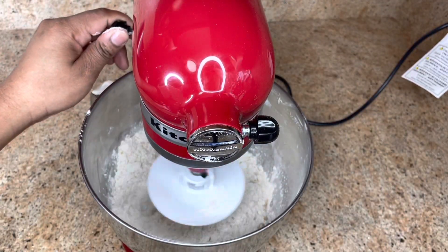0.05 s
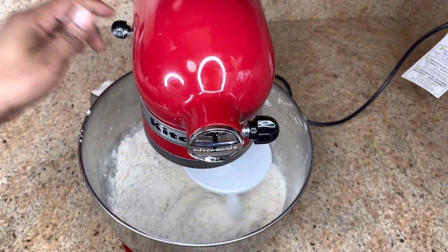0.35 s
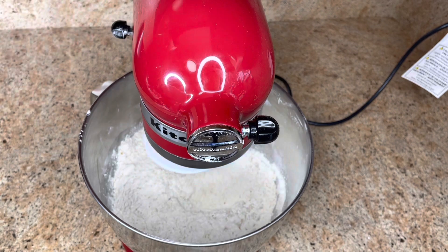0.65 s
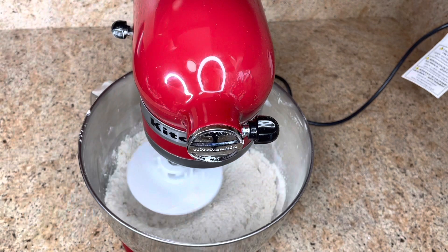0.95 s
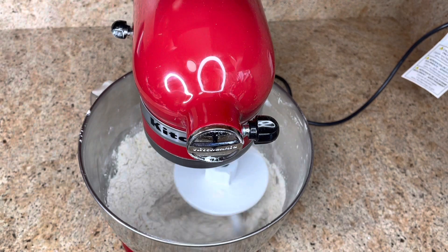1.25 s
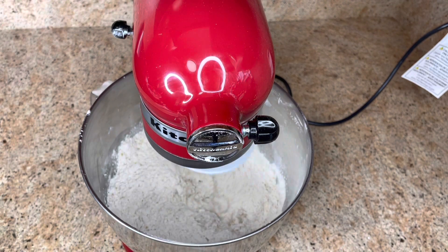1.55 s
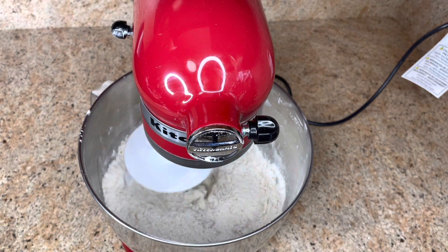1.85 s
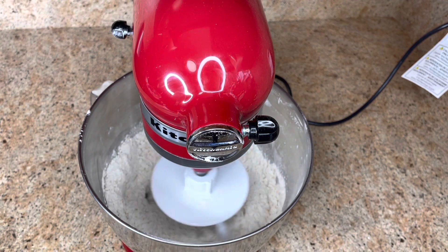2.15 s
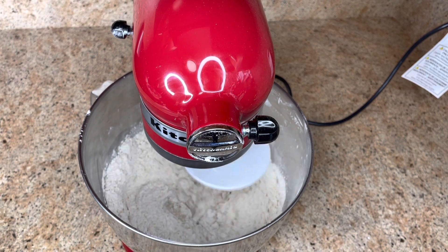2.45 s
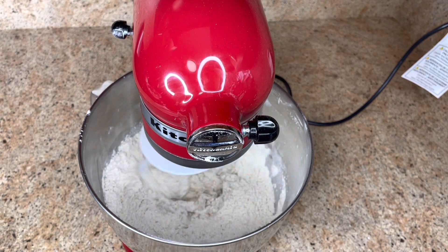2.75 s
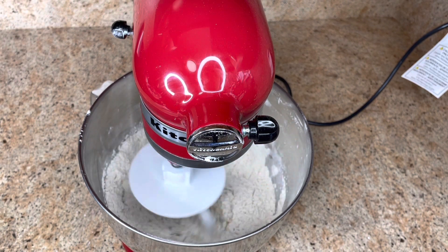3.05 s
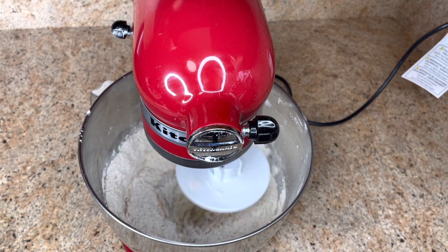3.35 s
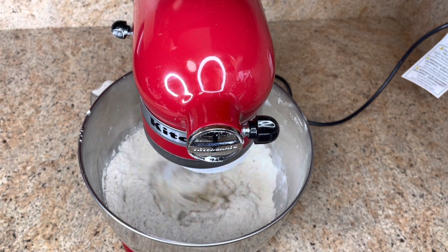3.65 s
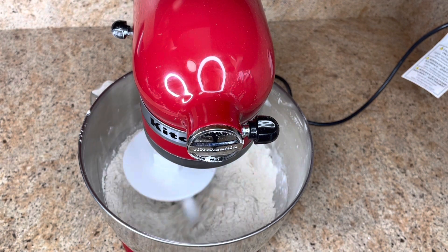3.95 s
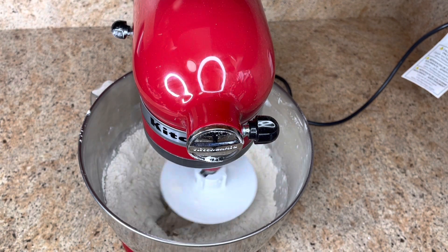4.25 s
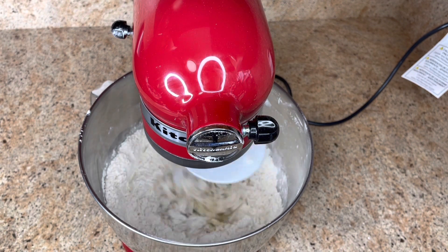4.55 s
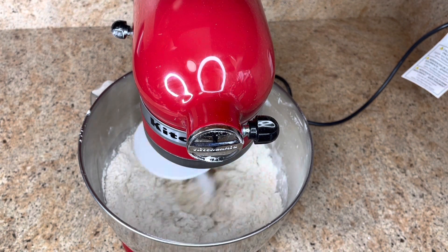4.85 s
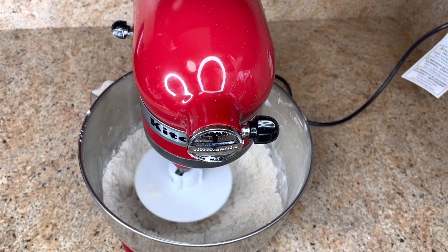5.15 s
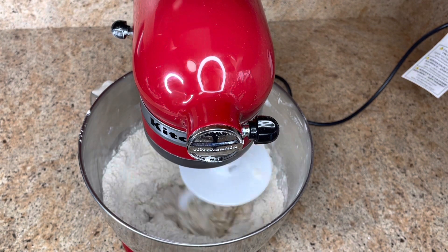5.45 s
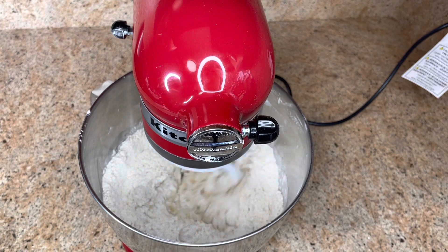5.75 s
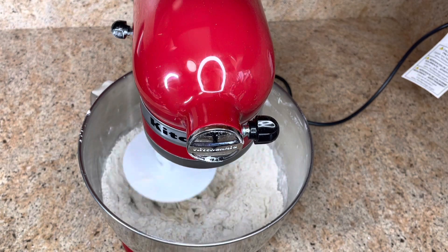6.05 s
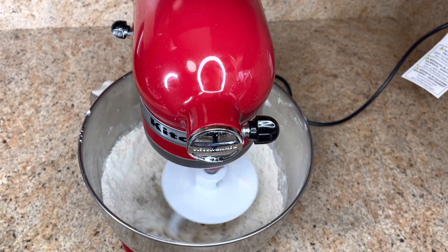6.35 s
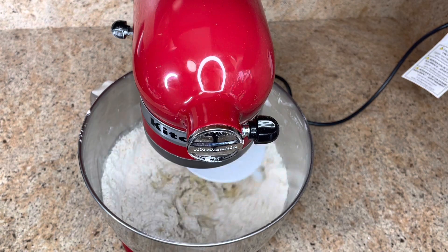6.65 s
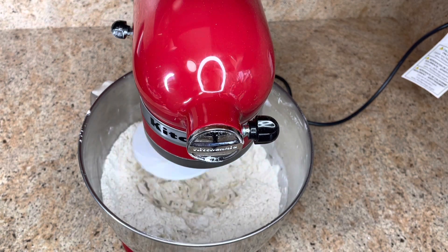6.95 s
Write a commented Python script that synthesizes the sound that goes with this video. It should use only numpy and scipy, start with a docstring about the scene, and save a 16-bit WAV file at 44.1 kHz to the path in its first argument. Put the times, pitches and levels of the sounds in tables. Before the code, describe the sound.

A stand mixer runs steadily close by, its motor buzzing and whining over a pulsing gear rumble and dull knocks of dough.

```python
"""Stand mixer kneading dough

A brush motor, heard close by, buzzes with the chopped mains current and whines at the commutator rate.
Its rattle excites the resonances of housing and steel bowl, over the hiss of brushes and cooling air.
The gears rumble at each push of the hook; lumps knock, and the dough groans by stick-slip friction."""
import sys
import numpy as np
from scipy import signal
from scipy.fft import rfft, irfft
from scipy.io import wavfile

SR = 44100
rng = np.random.default_rng(int(sys.argv[2]) if len(sys.argv) > 2 else 0)


def materialize(psi):
    """Save the field psi as 16-bit PCM at rate SR to the path in sys.argv[1].

    A 1-D psi becomes a single channel; in a 2-D psi each row is a channel.
    """
    bounded = np.clip(np.atleast_2d(psi).T, -1, 1)
    quanta = np.round(bounded * 32767).astype(np.int16)
    wavfile.write(sys.argv[1], SR, quanta)


N = 313992
TIME = np.arange(N) / SR
FREQS = np.maximum(np.arange(N // 2 + 1) * SR / N, 1)
PULSE_HZ, COMMUTATOR_BARS = 120, 22   # pulses of mains current; bars around the rotor
SPIN_HZ, SPIN_START_S = 3.14, .045   # the hook spins on its own axis

# Motor speed, sinking as the dough stiffens. Each row: time in seconds, turns per minute.
MOTOR_SPEED = [(0, 2732), (.5, 2740), (1, 2739), (2, 2744), (2.55, 2736), (3.05, 2735), (3.55, 2738),
               (4.05, 2726), (4.6, 2730), (5.1, 2723), (6.6, 2724), (7.12, 2717)]
# Motor loudness. Each row: time in seconds, relative levels of buzz and of whine in dB.
MOTOR_LEVELS = [(0.25, -42, -44.5), (0.75, -41, -46.5), (1.18, -40, -45.5), (3.05, -40.5, -47),
                (3.62, -42, -46.5), (5.43, -41.5, -49.5), (6.12, -40, -46), (6.73, -40, -48.5),
                (6.9, -40, -49)]
# Partials of the buzz. Each row: multiple of the pulse rate, multiple of the shaft rate added to it,
# relative level in dB, left-right balance in dB.
BUZZ_PARTIALS = [(0, 1, -60.6, 0), (1, 0, -45.6, 0), (2, 0, -53.5, -1), (4, 1, -62.5, -1),
                 (4, 2, -58.1, 10), (5, 1, -61.7, 4), (6, -1, -59.3, 4), (6, 0, -57, 4), (8, 1, -59.2, 8),
                 (0, 15, -58.1, 6), (0, 16, -59.1, 3), (0, 17, -53.5, 6), (2, 17, -62.2, 7),
                 (-1, 18, -58.4, 1), (-1, 19, -53.4, 3), (-1, 20, -54.0, 0), (0, 20, -57.9, 6),
                 (1, 20, -59.9, 0), (-2, 21, -43, 3), (-1, 21, -55.5, -3), (0, 21, -54.1, 1),
                 (1, 21, -52.7, 4), (2, 21, -58.8, 8), (3, 21, -58.7, 5), (-2, 22, -45.8, 7),
                 (-3, 23, -58.9, 4), (-2, 23, -55.9, 0), (-1, 23, -56.9, 3), (0, 23, -55.3, 4),
                 (1, 23, -62.2, 15), (2, 23, -60.8, -3), (-3, 24, -54.0, 2), (-2, 24, -62.2, -13),
                 (-1, 24, -62.1, -3), (-3, 25, -57.6, 3), (-1, 25, -57.2, 7), (0, 25, -58.3, 3),
                 (-4, 27, -59.4, 5), (3, 39, -59.9, 10), (2, 41, -63.1, 11), (1, 42, -59.8, 11),
                 (2, 42, -60.1, 4), (1, 43, -60.0, 10), (0, 44, -55.5, 7), (0, 45, -57.5, 7),
                 (1, 45, -61.1, 3), (0, 47, -59.8, 7), (-1, 49, -61.8, 16), (0, 43, -61, 5),
                 (0, 87, -68, 4)]
# The drone, where the bowl amplifies the buzz. Each row: time in seconds, relative level in dB.
DRONE_LEVELS = [(0, -41), (1.05, -43), (1.6, -41), (2.3, -41), (2.8, -42.5), (3.7, -40), (4.4, -41.5),
                (5.2, -40.5), (6, -42.5), (7.12, -42.5)]
# Throbs of the drone. Each row: time of the crest in seconds, swing in dB.
DRONE_THROBS = [(0, 1.5), (.38, 2), (.8, 1.5), (1.28, 2.2), (1.57, 2.2), (1.85, 1.6), (2.12, 1.6),
                (2.42, 2.6), (2.8, 3.6), (3.11, 3), (3.4, 2.4), (3.72, 2.2), (4.06, 3.2), (4.37, 3.6),
                (4.61, 3), (4.84, 1.6), (5.1, 1), (5.45, 1), (5.85, 1), (6.18, 1), (6.48, 1), (6.9, 1),
                (7.2, 1)]
# Commutator tone and sidebands. Each row: offset in pulse rates, relative level in dB, balance in dB.
WHINE_PARTIALS = [(-1, -6.3, -3), (0, 1.7, 9), (1, -4.3, 10), (2, -13, -1)]
# Overtones of bars striking brushes. Each row: multiple of the bar rate, level in dB.
BAR_OVERTONES = [(2, -57.5), (4, -66), (6, -75), (10, -68), (12, -61)]
# The thin motor whistle. Each row: time in seconds, relative level in dB.
WHISTLE_LEVELS = [(0.1, -48.5), (0.82, -48.5), (1.07, -56), (1.27, -54.5), (4.68, -50.5), (4.92, -60.5),
                  (5.13, -49.5), (6.1, -50.5), (6.63, -51.5), (6.88, -54), (7.1, -48)]
# The hook meets the dough twice per orbit. Each row: time in seconds, relative load in dB.
HOOK_PUSHES = [(-.05, -5.5), (.45, 1.5), (.97, -0.5), (1.46, 1), (1.97, 1.5), (2.52, 0), (2.96, 0.7),
               (3.57, 1), (4.02, 0), (4.65, -0.2), (5.14, 1), (5.65, 0.9), (6.13, 0.6), (6.72, 1.5),
               (7.18, 1.5)]
# Gear tones. Each row: nominal frequency in Hz, relative level in dB, swell in dB per dB of load.
GEAR_TONES = [(52, -24, .4), (75.3, -11.5, .5), (106.2, -2, 1.3), (136.6, -3.4, 1.2)]
# Gear rumble through the worktop. Each row: frequency in Hz, relative spectral level in dB.
RUMBLE_SPECTRUM = [(20, -68), (42, -68), (62, -34), (78, -29.5), (92, -25.5), (112, -24.5), (140, -29),
                   (165, -47), (200, -45), (300, -68)]
# Lumps striking the hook. Each row: start in seconds, peak of the envelope in dB.
LUMP_KNOCKS = [(.402, -26), (1.45, -33), (1.887, -30), (1.983, -33), (2.391, -35), (2.517, -26),
               (2.888, -27), (3.528, -26), (4.611, -25), (4.676, -37), (5.119, -35), (5.577, -29.5),
               (5.750, -39), (6.092, -26.5), (6.637, -31), (6.702, -26), (6.765, -29)]
# Modes of housing and bowl. Each row: frequency in Hz, width in Hz, spectral level in dB, balance in dB.
HOUSING_MODES = [(419, 16, -76, 13), (591, 31, -72.5, 1.5), (688, 14, -70.5, 6), (717, 14, -70, 3),
                 (750, 24, -68, 4), (788, 14, -72, -2), (837, 12, -77, -5), (890, 20, -74, -1),
                 (1005, 20, -71, 3), (1046, 15, -75.5, 0), (1078, 15, -75.5, 1), (1130, 22, -71.5, 4),
                 (1215, 12, -82, -5), (1284, 7.9, -69.5, 2), (1316, 14, -71.5, 26), (1547, 44, -75.5, -6),
                 (1592, 6, -68, 11), (1713, 34, -81.5, 16), (2066, 83, -72.5, 9), (2113, 20, -69, 2),
                 (2245, 48, -78.5, 36), (2432, 43, -76.5, -20), (2585, 13, -69.5, 17), (2816, 84, -77, 2.5),
                 (2954, 58, -81, -2), (3078, 35, -78, 25), (3344, 224, -85.5, 7)]
# Rasp of the upper housing modes. Each row: time in seconds, level in dB before its swing is scaled.
RASP_CONTOUR = [(0, -54), (.2, -48.5), (.4, -49.5), (.85, -49), (1.1, -51.5), (1.3, -50.3), (1.65, -49.8),
                (1.8, -52), (2.1, -51), (2.6, -52), (3.05, -50.5), (3.2, -51.5), (4.2, -51.2),
                (4.55, -49.6), (4.9, -49), (5.3, -49.6), (5.5, -51.2), (5.9, -48.8), (6.25, -49.5),
                (6.5, -50.8), (6.85, -48.5), (7.12, -50.5)]
# Modes under the brushes. Each row: frequency in Hz, width in Hz, spectral level in dB, balance in dB.
BRUSH_MODES = [(3980, 60, -84.3, 5), (4835, 380, -90, 3), (5300, 85, -89, 6), (6050, 250, -91, 1),
               (6580, 190, -91, 2), (7170, 200, -93, 4), (8050, 700, -93, 0), (8750, 150, -80.5, 0),
               (9090, 210, -80.5, 0), (9650, 170, -88, 0), (10090, 270, -82, 0), (11250, 460, -83.5, 0),
               (12010, 130, -82, 0), (12700, 450, -94, 0)]
# Cooling air and friction. Each row: frequency in Hz, spectral level in dB.
AIR_SPECTRUM = [(170, -67), (200, -85.5), (330, -77), (500, -80.5), (900, -73.5), (1400, -81.5),
                (2600, -87), (3500, -87.5), (4400, -92), (5550, -99.5), (8000, -104), (12300, -110),
                (13500, -100.5), (14000, -108.9)]
# Groans of the dough. Each row: middle in seconds, length in seconds, frequency in Hz, level in dB.
DOUGH_GROANS = [(.23, 0.31, 243.7, -45.5), (0.509, 0.26, 242.7, -44), (1.422, .2, 235, -45.5),
                (1.799, .16, 265, -49.5), (2.454, 0.2, 261, -50), (2.764, 0.22, 270, -51),
                (4.34, 0.31, 270, -51.5), (6.476, 0.21, 276, -49)]
# Hollow of the bowl. Each row: frequency in Hz, width in Hz, relative level in dB, balance in dB.
CAVITY_MODES = [(239.8, 18, 11, 8.5), (266, 13, 8.5, -3), (418, 44, -2, -14)]
# Likeness of left and right. Each row: frequency in Hz, squared coherence from 0 to 1.
COHERENCE = [(150, .96), (400, .85), (800, .7), (1300, .5), (2000, .35), (7000, .25), (7700, .97),
             (9400, .97), (10200, .6), (12500, .9)]
# Phase lead of left over right. Each row: frequency in Hz, lead in radians.
PHASE_LEAD = [(100, .08), (200, .05), (520, .1), (660, -1.1), (875, -1), (935, -3), (1010, -.6),
              (1550, -.1), (2130, -2.4), (2280, .3), (3000, 1.3), (7100, -1.2), (7700, -3), (9300, -3.25),
              (9900, -4), (12000, -5.3), (12600, -6.2)]


def from_db(db):
    """Amplitude ratio of a level in dB."""
    return np.exp(np.asarray(db) * (np.log(10) / 20))


def unit_rms(x):
    """Normalisation to unit power."""
    return x / np.sqrt(np.mean(x ** 2) + 1e-20)


def in_time(rows):
    """Linear interpolation of a table's columns at every sample."""
    times, *columns = np.transpose(rows)
    return [np.interp(TIME, times, column) for column in columns]


def swell_of(rows):
    """Deviation of a level curve from its mean, in dB."""
    db, = in_time(rows)
    return db - db.mean()


def event_phase(rows):
    """Phase in cycles, reaching a whole number at each event."""
    return np.interp(TIME, np.transpose(rows)[0], np.arange(len(rows)))


def at_hz(points, hz):
    """Interpolation of a spectrum on a log-frequency axis."""
    freqs, values = np.transpose(points)
    return np.interp(np.log(hz), np.log(np.sort(freqs)), values)


def drift(corner_hz):
    """Low-pass noise: a slow random fluctuation of rms 1."""
    spectrum = rfft(rng.standard_normal(N // 40))
    slow = irfft(spectrum / (1 + (FREQS[:N // 80 + 1] / corner_hz) ** 2) ** 2)
    return np.interp(TIME, np.linspace(0, TIME[-1], len(slow)), unit_rms(slow))


def pan(balance_db):
    """Left and right gains of constant total power."""
    return unit_rms(from_db(np.array([[.5], [-.5]]) * balance_db))


def tone(cycles, hz, balance_db=0):
    """A stereo sinusoid of rms 1 and random starting phase; hz sets the phase lead of the left side."""
    lead = at_hz(PHASE_LEAD, hz) * np.array([[.5], [-.5]])
    return np.sqrt(2) * pan(balance_db) * np.sin(2 * np.pi * (cycles + rng.random()) + lead)


def resonances(modes):
    """Power addition: the stereo spectral density of steep-sided modes."""
    return sum((pan(balance) * from_db(db) / (1 + (0.89 * (FREQS - hz) / width) ** 2)) ** 2
               for hz, width, db, balance in modes)


def friction(force, power):
    """Source and filter: partly coherent stereo noise follows a force and takes on a power spectrum."""
    mid, side = rfft(rng.standard_normal((2, N)) * unit_rms(force))
    coherence = at_hz(COHERENCE, FREQS) ** .5
    signs = np.array([[1], [-1]])
    pair = np.sqrt(1 + coherence) * mid + signs * np.sqrt(1 - coherence) * side
    pair *= np.exp(.5j * signs * at_hz(PHASE_LEAD, FREQS))
    return irfft(pair * np.sqrt(power * SR) / 2, N)


def reflections(count=10, echo_db=-22):
    """Comb filtering: short echoes from worktop, bowl and wall ripple the power spectrum."""
    delays_s = rng.uniform(0.0038, .025, count)
    paths = 1 + from_db(echo_db) * np.exp(-2j * np.pi * delays_s[:, None] * FREQS).sum(0)
    return unit_rms(abs(paths)) ** 2


def mains_buzz(turns, shaft_hz, buzz_db, load_db, spin):
    """Modulation: current pulses jolt the rotor, whose turning splits their harmonics into sidebands."""
    hum, octave, drone, buzz = np.zeros((4, 2, N))
    for pulses, order, db, balance in BUZZ_PARTIALS:
        hz = pulses * PULSE_HZ + order * shaft_hz
        band = hum if hz < 200 else octave if hz < 300 else drone if 690 < hz < 790 else buzz
        band += from_db(db - 0.76) * tone(pulses * PULSE_HZ * TIME + order * turns, hz, balance)
    hum *= from_db(0.21 * load_db)   # a loaded motor draws more current
    octave *= from_db(2.5 * spin)
    throb_db = in_time(DRONE_THROBS)[0] * np.cos(2 * np.pi * event_phase(DRONE_THROBS))
    drone *= from_db(1.5 + swell_of(DRONE_LEVELS) + throb_db)
    buzz *= from_db(buzz_db - buzz_db.mean())
    return hum + octave + drone + buzz


def commutator(turns, shaft_hz, whine_db, jitter=0.014, chatter=0.06):
    """Periodic contact: bars pass under the brushes, and the pulsing current adds sidebands."""
    bar_cycles = COMMUTATOR_BARS * turns + jitter * drift(22)
    bar_hz = COMMUTATOR_BARS * shaft_hz
    whine = 0
    for pulses, db, balance in WHINE_PARTIALS:
        offset_hz = round(pulses) * PULSE_HZ
        gain = from_db(whine_db + db + 0.5 + 0.46 * drift(12))
        whine += gain * tone(bar_cycles + offset_hz * TIME, bar_hz + offset_hz, balance)
    for order, db in BAR_OVERTONES:   # brush chatter blurs these
        gain = from_db(db + .6 * drift(30))
        whine += gain * tone(round(order) * (bar_cycles + chatter * drift(29)), order * bar_hz)
    return whine


def whistle(turns, shaft_hz, jitter=0.033):
    """Resonance: twice the bar rate plus the pulse rate falls on a housing mode and whistles roughly."""
    cycles = 2 * COMMUTATOR_BARS * turns + PULSE_HZ * TIME + jitter * drift(44)
    gain = from_db(in_time(WHISTLE_LEVELS)[0] + 7 - 1.5 * drift(40))
    return gain * tone(cycles, 2 * COMMUTATOR_BARS * shaft_hz + PULSE_HZ, balance_db=11)


def hook_load(pushes, idle_load=.33):
    """Cyclic loading, in relative dB: a rounded hump at each push, a short gap as the dough lets go."""
    effort_db, = in_time(HOOK_PUSHES)
    hump_db = 10 * np.log10(idle_load ** 2 + np.cos(np.pi * pushes) ** 2)
    return effort_db + hump_db - hump_db.mean()


def gears(motor_time, pushes, load_db, mesh_hz=30.5, slack=0.021):
    """Gear meshing: each tooth shakes the stand, and both tones and rumble swell with the load."""
    # the teeth run half a cycle ahead between pushes
    play = (pushes - np.sin(2 * np.pi * pushes) / (2 * np.pi)) / 2 + slack * drift(10)
    teeth = 0
    for hz, db, swell in GEAR_TONES:
        gain = from_db(db - 40.5 + swell * load_db + drift(20))
        teeth += gain * tone(hz * motor_time + play + slack * drift(5.9), hz)
    force = from_db(3.5 * np.cos(2 * np.pi * mesh_hz * motor_time))
    rumble = friction(force, from_db(at_hz(RUMBLE_SPECTRUM, FREQS)) ** 2)
    return teeth + from_db(-38 + 0.74 * load_db) * rumble


def knocks(thud_hz=118, rise_s=0.0086):
    """Damped vibration: a lump jolts the hook, and the stand thuds dully on the worktop."""
    thuds = np.zeros(N)
    for start, db in LUMP_KNOCKS:
        age = np.maximum(TIME - start, 0)
        envelope = age / rise_s * np.exp(1 - age / rise_s)
        thuds += from_db(db) * envelope * np.sin(2 * np.pi * thud_hz * age)
    return thuds


def housing(turns, spin, pulse_db=2.0, shaft_db=0.7, rasp_above_hz=1400):
    """Forced vibration: rattle, pressed by current pulses and shaft turns, rings in housing and bowl."""
    force = from_db(pulse_db * np.cos(2 * np.pi * PULSE_HZ * TIME) + shaft_db * np.cos(2 * np.pi * turns))
    power = resonances(HOUSING_MODES)
    high = FREQS > rasp_above_hz
    rasp = from_db(0.5 + 0.61 * swell_of(RASP_CONTOUR) + .5 * spin) * friction(force, power * high)
    return friction(force, power * ~high) + rasp


def brushes(turns, runout_db=0.76, oval_db=-0.6):
    """Sliding friction: brushes hiss on an off-centre, oval commutator, in the rush of cooling air."""
    force = from_db(runout_db * np.cos(2 * np.pi * turns) + oval_db * np.cos(4 * np.pi * turns))
    air = from_db(at_hz(AIR_SPECTRUM, FREQS)) ** 2 / (1 + (130 / FREQS) ** 4)
    return friction(force, (air + resonances(BRUSH_MODES)) * reflections())


def groans(sag_hz_per_s=50):
    """Stick-slip friction: dough catches on the wall and draws a short, sinking groan from the bowl."""
    jitter = .06 * drift(25)
    sound = 0
    for middle, length, hz, db in DOUGH_GROANS:
        offset_s = TIME - middle
        swell = np.cos(np.pi * np.clip(offset_s / length, -.5, .5))
        cycles = hz * offset_s - sag_hz_per_s * offset_s ** 2 / 2 + jitter
        sound += from_db(db) * swell * tone(cycles, hz)
    return sound


def dough_rub(spin):
    """Cavity resonance: dough rubs the steel, harder with each spin, and sounds the hollow of the bowl."""
    return from_db(-52.5 + 0.5 * spin) * unit_rms(friction(np.ones(N), resonances(CAVITY_MODES)))


def fan(turns, shaft_hz, load_db, blades=10, sink_db_per_s=0.32):
    """Blade-passing tone: the cooling fan wavers as the hook spins and fades as the dough stiffens."""
    waver_db = 0.7 * np.cos(2 * np.pi * SPIN_HZ * TIME) + 1.25 * drift(6.7)
    fade_db = 0.056 * load_db + sink_db_per_s * (TIME - TIME.mean())
    cycles = blades * turns + 0.058 * drift(2.7)
    return from_db(-53.5 + waver_db - fade_db) * tone(cycles, blades * shaft_hz, balance_db=-4)


def scene(spin_rpm=4.7, hunting_rpm=3.65):
    """Superposition: one shaft drives motor, gears and fan, while the hook works the dough."""
    pushes = event_phase(HOOK_PUSHES)
    load_db = hook_load(pushes)
    spin = np.cos(2 * np.pi * SPIN_HZ * (TIME - SPIN_START_S))
    # the speed swings with each spin, and the governor hunts
    rpm = in_time(MOTOR_SPEED)[0] + spin_rpm * spin + hunting_rpm * drift(12.3)
    turns = np.cumsum(rpm / 60) / SR
    shaft_hz = rpm.mean() / 60
    motor_time = turns / shaft_hz   # runs fast or slow with the motor
    buzz_db, whine_db = in_time(MOTOR_LEVELS)
    motor = mains_buzz(turns, shaft_hz, buzz_db, load_db, spin)
    motor += commutator(turns, shaft_hz, whine_db) + brushes(turns)
    drive = gears(motor_time, pushes, load_db) + knocks() + fan(turns, shaft_hz, load_db)
    return motor + whistle(turns, shaft_hz) + drive + housing(turns, spin) + dough_rub(spin) + groans()


def record(dry, cutoff_hz=14000):
    """Low-pass filtering: the highest treble is cut steeply."""
    return signal.sosfilt(signal.ellip(10, .1, 80, cutoff_hz, fs=SR, output="sos"), dry)


dry = scene()
out = record(dry)
materialize(out)
```